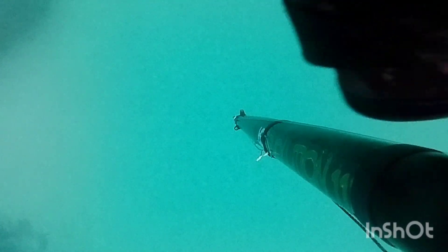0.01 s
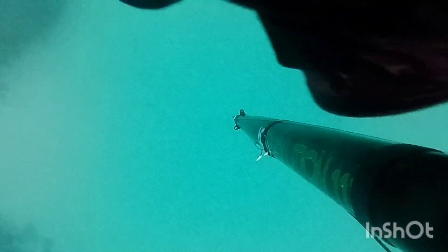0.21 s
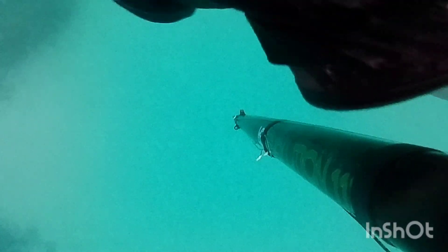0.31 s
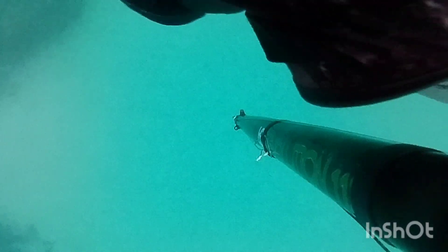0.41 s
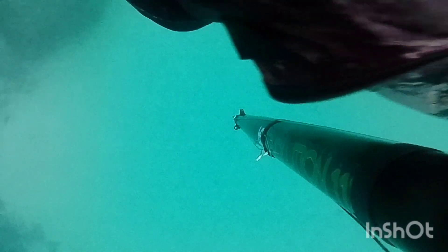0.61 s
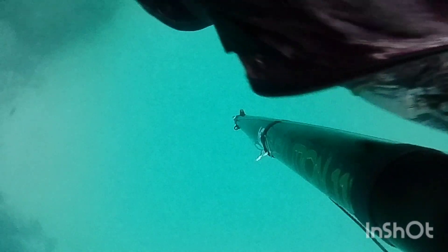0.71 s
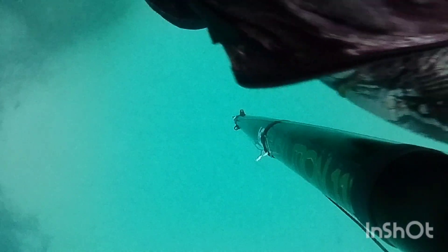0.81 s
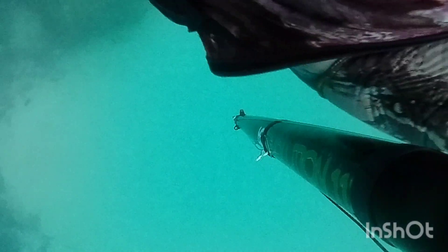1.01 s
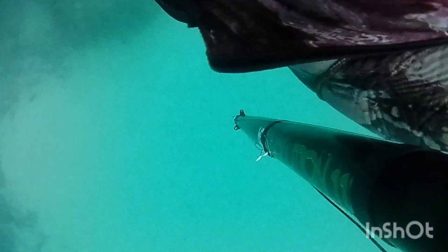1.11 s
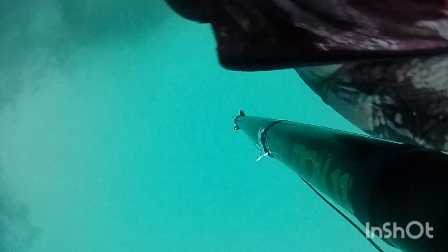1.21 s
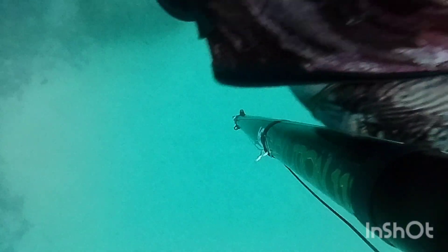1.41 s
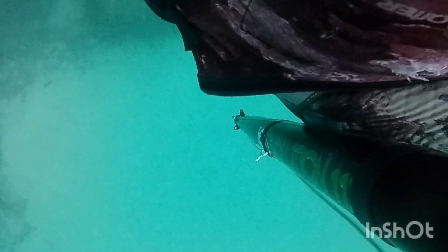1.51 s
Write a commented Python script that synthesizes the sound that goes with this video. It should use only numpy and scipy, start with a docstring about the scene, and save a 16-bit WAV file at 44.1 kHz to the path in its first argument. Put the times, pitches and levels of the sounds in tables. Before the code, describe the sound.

Underwater, a short scrape and light knocks lead into two hard, loud clicks, then one medium knock and sparse faint taps and ticks, heard from inside a camera housing with low water rumble and quiet hiss.

```python
"""Under water, a diver's gear knocks against a camera in a sealed housing: each knock is a sum of fading tones.
Something rubs on the housing first, made of many tiny random slips.
Then come two sharp clicks, the second loud enough to overload the microphone; the mount sways as a low tone.
Softer knocks and thin bright snaps (filtered impulses) come before and after the clicks; runs of tiny ticks
(short tones) follow. Behind it all lie a faint rumble, a wash of water and a steady hiss, shaped from noise."""
import sys
import numpy as np
from scipy import signal
from scipy.fft import rfft, irfft
from scipy.io import wavfile
from scipy.ndimage import uniform_filter1d

SR = 44100
rng = np.random.default_rng(int(sys.argv[2]) if len(sys.argv) > 2 else 0)


def master_out(mix):
    """Clip the mix to full scale and print it as 16-bit PCM to the path in sys.argv[1]."""
    frames = np.transpose(np.atleast_2d(mix))
    ceiling = np.clip(frames, -1, 1)
    pcm = np.round(ceiling * 32767).astype(np.int16)
    wavfile.write(sys.argv[1], SR, pcm)


N = 70560  # length in samples
TIME = np.arange(N) / SR  # in seconds

# Spectra give relative strengths. All levels are those in the mix, ahead of the microphone's drive.
# Low rumble of the water. Each row: frequency in Hz, strength in dB per Hz.
RUMBLE_SPECTRUM = [(8, -2), (18, -1.5), (30, -8), (60, -8), (100, -24), (200, -40.5), (500, -70)]
# How the rumble swells. Each row: time in seconds, level in dB.
RUMBLE_LEVEL = [(0, -53), (.1, -43.5), (.2, -56.5), (.3, -43), (.4, -55.5), (.75, -56.5), (.9, -58),
                (1.15, -55), (1.3, -49), (1.45, -57), (1.6, -45.5)]
# Water washing along the housing. Each row: frequency in Hz, strength in dB per Hz.
WASH_SPECTRUM = [(30, -14.5), (90, -1), (140, 3), (220, 2.5), (300, -13.5), (420, -10), (620, -14),
                 (900, -24), (2000, -52.5)]
# How the wash swells. Each row: time in seconds, level in dB.
WASH_LEVEL = [(0, -63), (.15, -50), (.185, -47.5), (.22, -41.5), (.27, -37), (.32, -56.5), (.42, -65.5),
              (.6, -65), (.66, -60.5), (.78, -66), (.98, -69.5), (1.1, -59.5), (1.22, -64.5), (1.36, -54.5),
              (1.46, -61.5), (1.6, -62.5)]
# Steady hiss. Each row: frequency in Hz, strength in dB per Hz.
HISS_SPECTRUM = [(100, -0.5), (600, -11), (1000, -14), (1250, -5), (1450, 3.5), (1700, -0.5), (2050, -8.5),
                 (2400, -12), (2750, -7.5), (3200, -16.5), (4200, -19), (5000, -12), (5900, -14),
                 (6800, -14), (8500, -18), (10500, -19), (12000, -28.5), (15500, -31.5)]
HISS_DB = -68

# Slow sway of the mount after the loudest click: a wide swing, and a small one that lingers.
SWAY_START_S, SWAY_HZ, SWAY_RISE_S = 0.2545, 19.3, 0.006
SWAY_DB, SWAY_T60_S = -31, 1  # T60 is the time a sound takes to fade by 60 dB
LINGER_DB, LINGER_T60_S = -44, 5.1

# How strongly something rubs on the housing. Each row: time in seconds, level in dB.
RUB_LEVEL = [(0, -45.5), (.03, -42), (.04, -46.5), (.075, -45.5), (.11, -46.5), (.14, -46.5), (.17, -57.5),
             (.22, -59.5), (.29, -67.5), (.34, -89.5)]
# Spectrum of the rubbing. Each row: frequency in Hz, strength in dB per Hz.
RUB_SPECTRUM = [(100, -6.5), (300, -5.5), (480, -3), (620, 4.5), (720, -4), (880, -1.5), (1120, -14),
                (1350, -3.5), (1600, -2), (1750, -8), (2000, -2), (2250, -16), (2600, -14), (2950, -34),
                (3700, -33.5), (4600, -15), (5400, -29.5), (7300, -43), (9000, -50), (16000, -57)]
SLIPS_PER_S, SLIP_SPREAD_DB = 3700, -2.5  # average rate, and scale of the random cut in slip size
GRIP_DB, GRIP_S = 1.5, 0.0056  # how much and how quickly the rubbing pressure wanders

# Tiny ticks. Each row: start in seconds, level in dB, treble in dB.
TICKS = [(0.333, -47, -25), (0.4632, -47, -22.5), (0.487, -51, -23), (0.511, -45, -11), (.531, -54, -21),
         (0.556, -50, -13), (.968, -54, -8.5), (0.9964, -53.5, -7), (1.028, -54, -12), (1.057, -56, -5.5),
         (1.089, -51, -11)]
# The two resonances of a tick, low then treble. Each row: starting frequency in Hz, T60 in seconds.
TICK_MODES = [(1680, 0.031), (4650, 0.035)]
TICK_RISE_S = 0.003
TICK_SAG_PER_S, TICK_ROUGH = 7, 0.063  # pitch sag per second and pitch tremble, as fractions of the pitch

# Thin, bright snaps. Each row: start in seconds, level in dB.
SNAPS = [(.1325, -26), (.2527, 3.5), (0.2711, -25.5), (1.188, -39), (1.352, -46)]
# Spectrum of a snap. Each row: frequency in Hz, strength in dB.
SNAP_SPECTRUM = [(500, -16), (2800, -17), (3700, -14), (4450, 9.5), (5100, -1), (5700, -11), (6300, -12.5),
                 (7100, -18.5), (8000, -17), (9000, -24.5), (13000, -28), (16000, -44.5)]

# Knocks on the housing. Each row: start in seconds, level in dB, thud in dB, hollow in dB, clack in dB,
# edge in dB, click in dB, pitch ratio, ring length ratio, rebound delay in seconds, rebound level in dB.
KNOCKS = [(0.1298, -34.5, -3, -2, 5, 14, 12, 0.98, 0.88, 0.0016, 2),
          (0.1727, -29, 2.5, -12, -7, -7, -2, 0.99, 0.92, 0.00098, 2),
          (.182, -39, 19, -7, -18, -4, -9, 0.78, 0.81, 0.0014, 4),
          (.2015, -29.5, -26, -11.5, -7, 8, 4, 0.84, 0.68, 0.003, -17),
          (0.2177, -45.5, -0.5, 4, -4, 3, 6, 1.3, 1, 0.0015, 8),
          (0.2294, -5.5, -1, 2, -5.5, 9, -9, 0.96, 0.83, .00182, -6),
          (.2513, -0.5, 2, -2.5, 1, 6, -1, 1.01, 1.36, .00221, -9.5),
          (.2612, -25.5, -16, 8, -1.5, -8, -2, 1.02, 0.73, .0016, -7.5),
          (0.2736, -35.5, -10.5, 3, 8.5, 1.5, -0.5, 0.8, 1.6, 0.0017, -15),
          (0.3018, -40.5, -3, -3, 5, -30, -12, 1.04, 1.2, .00142, -1.6),
          (.369, -53, -8, 5, 6, -13, -9.5, 0.92, 0.925, 0.0016, -7),
          (.3792, -40.5, 4.5, 0.5, 1.5, -15, -5.5, 1.06, 1.5, 0.0014, -7.5),
          (.479, -51.5, -9.5, -16, -16.5, -10, -7, 1.08, 0.93, 0.0016, -3),
          (0.6333, -23, 4.5, 1.5, 8, 5, -8.5, 0.995, 1.17, 0.001437, -6.5),
          (0.6419, -36, -1.5, 10, -1, 4, 0.5, 0.89, 0.86, 0.0024, -5),
          (0.6572, -52.5, 16.5, -17, -6.5, -1, -4, 0.96, 0.76, 0.0023, 0),
          (.776, -51, -5.5, -20, -10.5, -11, -6.5, 0.91, 1.3, 0.0024, -6.5),
          (0.8577, -47, 6, 19.5, 4, 16, 15, .97, 1.84, 0.0025, -13),
          (.885, -47, -10, -20, -14, -16.5, -14.5, .96, 1.16, 0.0019, -15),
          (1.308, -50, 1, -14, -19.5, -14, -9.5, 1.15, 1.15, .003, -12),
          (1.3224, -49, -3.5, -5, -19.5, -17.5, -16, 0.93, 1.04, 0.0012, -1),
          (1.3548, -29, 3, -10, -15, -16, -6.5, 0.97, 1, 0.0015, -6.3),
          (1.5154, -42, 3, -5, -17, -19, -7.5, 0.99, 0.89, 0.0014, 2)]
# Tones of the housing, before a knock's pitch and length ratios.
# Each row: frequency in Hz, level in dB, T60 in seconds.
HOUSING_MODES = [(62, -31.5, 0.052), (131.2, -23, 0.042), (216.6, -17.5, 0.063), (416.3, -1, 0.02),
                 (616, -2.5, 0.03), (833.3, -1.5, 0.01), (1237.4, -7, .016), (1604.5, -3.5, 0.013),
                 (1887, -4, 0.0057), (2396, -14, 0.0098), (2750, -18.5, 0.0044), (3250, -28.5, 0.0089),
                 (4510, -22, 0.0051)]
# Centres of thud, knock, hollow, clack, edge and click, in that order. Each entry: frequency in Hz.
REGISTERS_HZ = [260, 600, 1050, 1650, 2700, 4400]
# Scattered ring of the attached gear. Each row: frequency in Hz, strength in dB per Hz.
SCATTER_SPECTRUM = [(80, -2), (220, -1), (550, 6.5), (1000, -7), (1700, -13), (2800, -21), (5000, -28),
                    (16000, -40.5)]
SCATTER_DB, SCATTER_T60_S, SCATTER_RISE_S = -14.5, 0.04, 0.00077  # level is relative to the knock
# Spectrum of the contact force, cushioned by water. Each row: frequency in Hz, strength in dB.
CONTACT_SPECTRUM = [(40, -1.5), (150, -0.5), (400, -1), (1900, 0), (2500, -5.5), (3000, -6), (4400, -5.5),
                    (6000, -11.5), (9000, -23.5), (16000, -35.5)]
ECHO_S, ECHO_DB = 0.0077, -24.5  # reflection off the diver and gear, relative to the knock

DRIVE_DB, CEILING = -1, 1  # gain into the microphone, and the height where it clips
BAND_EDGE_HZ = 15800


def amp(db):
    """Turns decibels into a gain."""
    return 10 ** (np.asarray(db) / 20)


def read(points, hz):
    """Reads a spectrum in dB between its points, along a log-frequency axis."""
    f, value = np.transpose(points)
    return np.interp(np.log(hz + 1), np.log(f + 1), value)


def level(points):
    """Turns a level curve into a gain for every sample."""
    return amp(np.interp(TIME, *np.transpose(points)))


def coloured(x, points):
    """Shapes x with a spectrum and brings its average strength (rms) to 1."""
    gain = amp(read(points, np.fft.rfftfreq(len(x), 1 / SR)))
    y = irfft(rfft(x) * gain, len(x))
    return y / np.sqrt(np.mean(y ** 2) + 1e-20)


def noise(points, size=N):
    """Makes random noise with a given spectrum, at rms 1."""
    return coloured(rng.standard_normal(size), points)


def causal(x, db_at, size=4096):
    """Filters x by the curve db_at(hz) without ringing ahead of the attack (minimum phase)."""
    log_gain = np.log(amp(db_at(abs(np.fft.fftfreq(size, 1 / SR)))))
    minimum_phase = np.exp(np.conj(signal.hilbert(log_gain)))
    taps = np.fft.ifft(minimum_phase).real[:size // 2]
    return signal.fftconvolve(x, taps)[:len(x)]


def add(mix, s, sound):
    """Mixes a sound in at time s, cutting it off where the mix ends."""
    part = mix[max(round(s * SR), 0):][:len(sound)]
    part += sound[:len(part)]


def water():
    """Rumble and wash swell and fade with the diver's movement, over a steady hiss; all are shaped noise."""
    rumble = level(RUMBLE_LEVEL) * noise(RUMBLE_SPECTRUM)
    wash = level(WASH_LEVEL) * noise(WASH_SPECTRUM)
    hiss = amp(HISS_DB) * noise(HISS_SPECTRUM)
    return rumble + wash + hiss


def sway():
    """The jolted mount swings widely, then lingers in a small sway, as a slow sine that fades."""
    wide = amp(SWAY_DB - 60 * TIME / SWAY_T60_S)
    lingering = amp(LINGER_DB - 60 * TIME / LINGER_T60_S)
    rise = 1 - np.exp(-TIME / SWAY_RISE_S)
    return (wide + lingering) * rise * np.sin(2 * np.pi * SWAY_HZ * TIME)


def rubbing():
    """Dense little slips of uneven size excite the housing, under a wandering pressure."""
    size_db = SLIP_SPREAD_DB * np.minimum(rng.exponential(1, N), 2)
    sizes = rng.standard_normal(N) * amp(size_db)
    grip = np.interp(TIME, np.arange(1000) * GRIP_S, rng.standard_normal(1000))
    slipping = rng.random(N) < SLIPS_PER_S / SR  # true at the samples where a slip happens
    slips = amp(GRIP_DB * grip) * sizes * slipping
    return level(RUB_LEVEL) * coloured(slips, RUB_SPECTRUM)


def tick(db, treble_db, size=2500):
    """A soft, short ring of two resonances whose pitch sags and trembles."""
    t = TIME[:size]
    ring = np.zeros(size)
    for (hz, t60), mode_db in zip(TICK_MODES, [0, treble_db]):
        # smoothed noise, scaled back up to about its old strength
        tremble = uniform_filter1d(rng.standard_normal(size), size=25) * np.sqrt(25)
        pitch_hz = hz * (1 - TICK_SAG_PER_S * t + TICK_ROUGH * tremble)
        turns = np.cumsum(pitch_hz) / SR
        ring += amp(mode_db - 60 * t / t60) * np.sin(2 * np.pi * turns)
    return amp(db) * np.minimum(t / TICK_RISE_S, 1) * ring


def snap(db, size=1000):
    """One sharp impulse, filtered so that it rings only briefly in the treble."""
    return amp(db) * causal(signal.unit_impulse(size), lambda hz: read(SNAP_SPECTRUM, hz))


def housing_ring(t, pitch, length):
    """The water-damped housing sounds its tones together, each fading at its own pace."""
    ring = np.zeros(len(t))
    for k, (hz, mode_db, t60) in enumerate(HOUSING_MODES):
        sign = (-1) ** (k + 1)  # neighbouring tones start in opposite directions
        fade = amp(mode_db - 60 * t / (t60 * length))
        ring += sign * fade * np.sin(2 * np.pi * hz * pitch * t)
    return ring


def gear_scatter(t):
    """The attached gear gives a scattered ring: a quick burst of fading noise."""
    fade = amp(SCATTER_DB - 60 * t / SCATTER_T60_S)
    return noise(SCATTER_SPECTRUM, len(t)) * fade * (1 - np.exp(-t / SCATTER_RISE_S))


def knock(db, thud_db, hollow_db, clack_db, edge_db, click_db, pitch, length, rebound_s, rebound_db, size=6000):
    """A blow and its rebound ring the housing; where it lands decides which registers speak, and how long."""
    t = TIME[:size]
    ring = housing_ring(t, pitch, length)
    blow = ring + gear_scatter(t)
    add(blow, rebound_s, amp(rebound_db) * ring)
    add(blow, ECHO_S, amp(ECHO_DB) * ring)
    registers_db = [thud_db, 0, hollow_db, clack_db, edge_db, click_db]
    colour = list(zip(REGISTERS_HZ, registers_db))
    return amp(db) * causal(blow, lambda hz: read(CONTACT_SPECTRUM, hz) + read(colour, hz))


def scene():
    """Everything reaches the one microphone inside the housing."""
    mix = water() + rubbing()
    add(mix, SWAY_START_S, sway())
    for source, table in ((tick, TICKS), (snap, SNAPS), (knock, KNOCKS)):
        for s, *settings in table:
            add(mix, s, source(*settings))
    return mix[None]  # one channel


def record(dry):
    """The microphone clips whatever passes its ceiling; then a low-pass filter limits the band."""
    clipped = np.clip(dry * amp(DRIVE_DB), -CEILING, CEILING)
    low_pass = signal.firwin(511, BAND_EDGE_HZ, window=("kaiser", 9), fs=SR)
    return signal.oaconvolve(clipped, low_pass[None], "same")


dry = scene()
out = record(dry)
master_out(out)
```